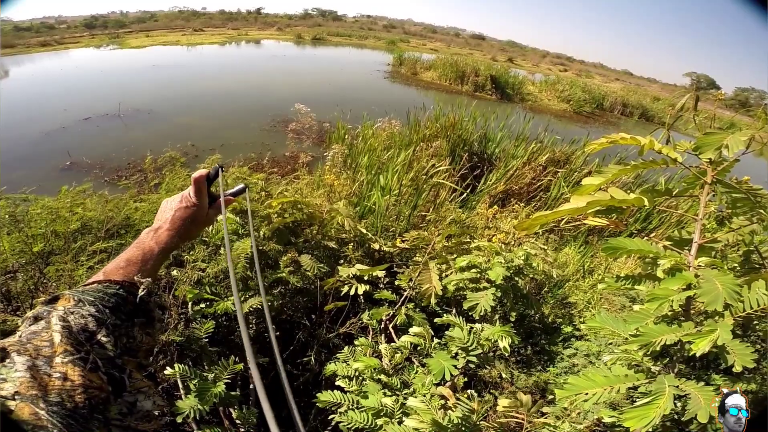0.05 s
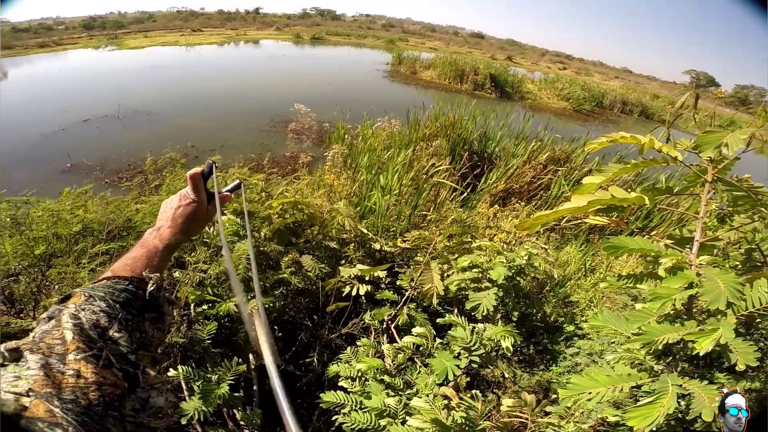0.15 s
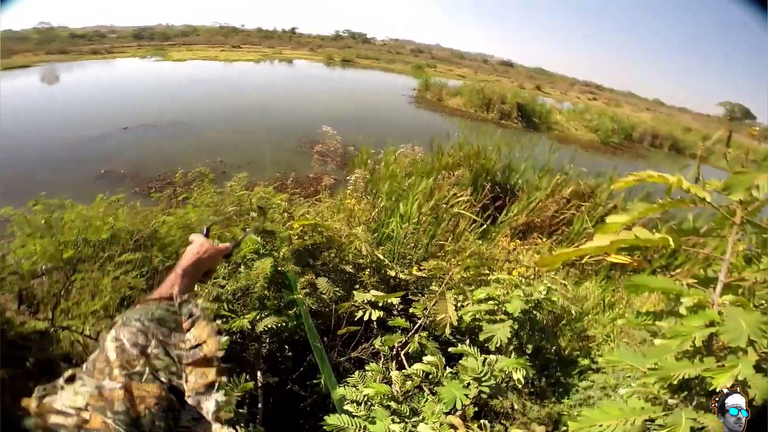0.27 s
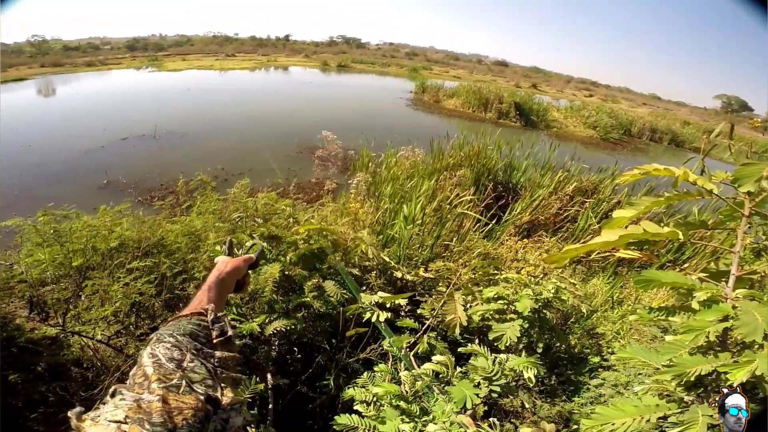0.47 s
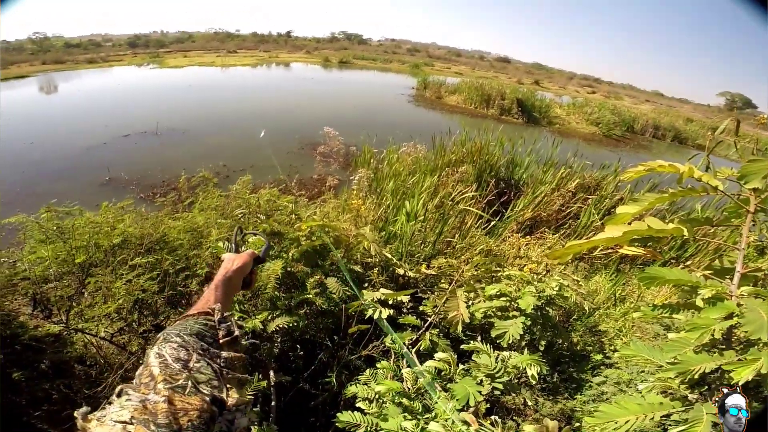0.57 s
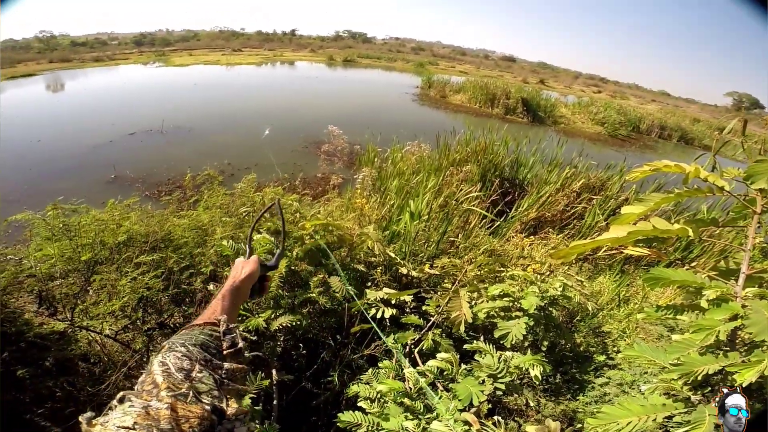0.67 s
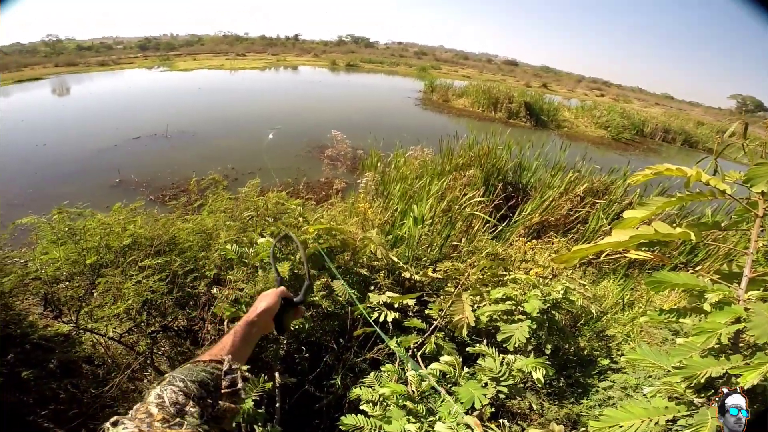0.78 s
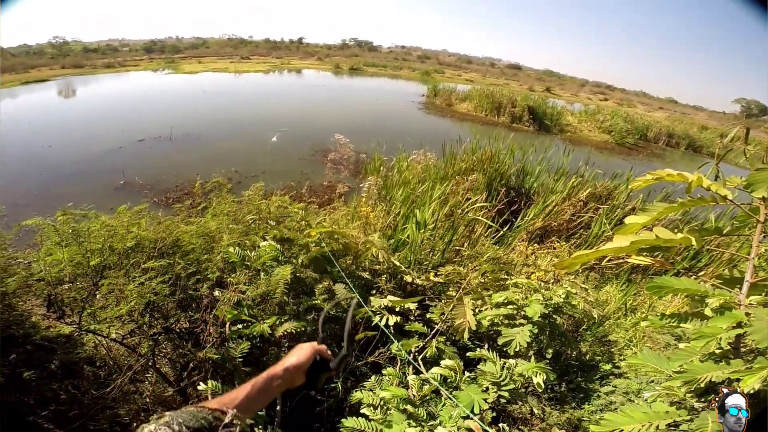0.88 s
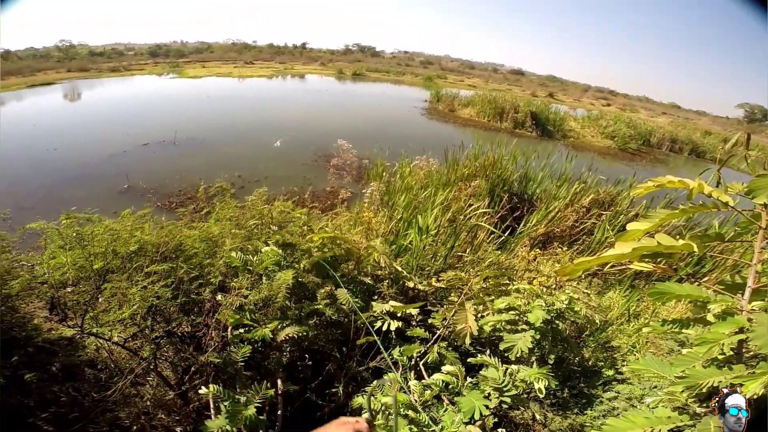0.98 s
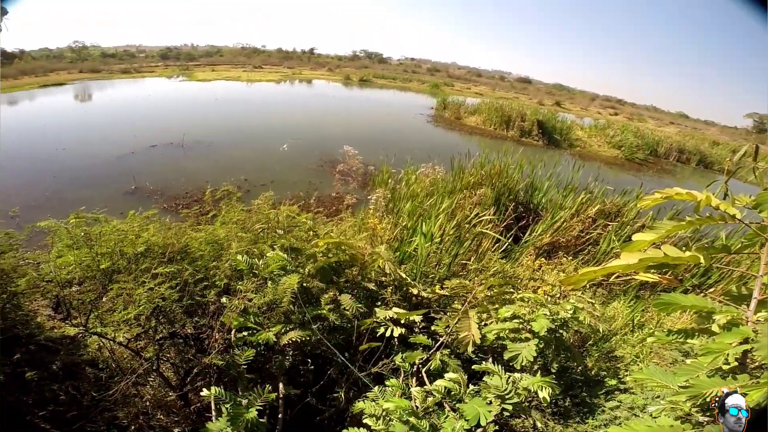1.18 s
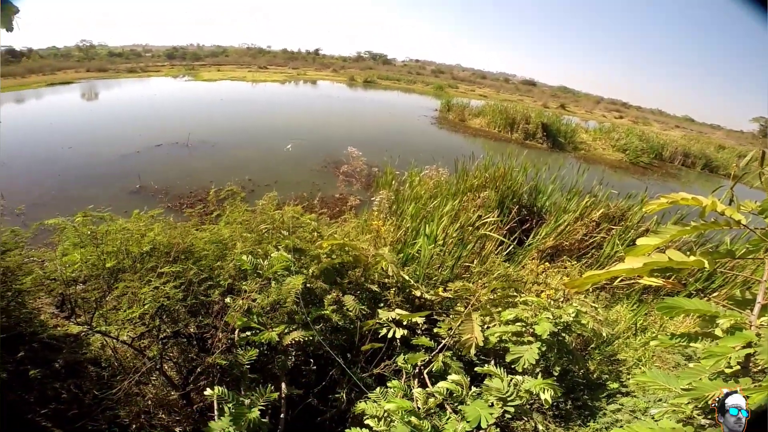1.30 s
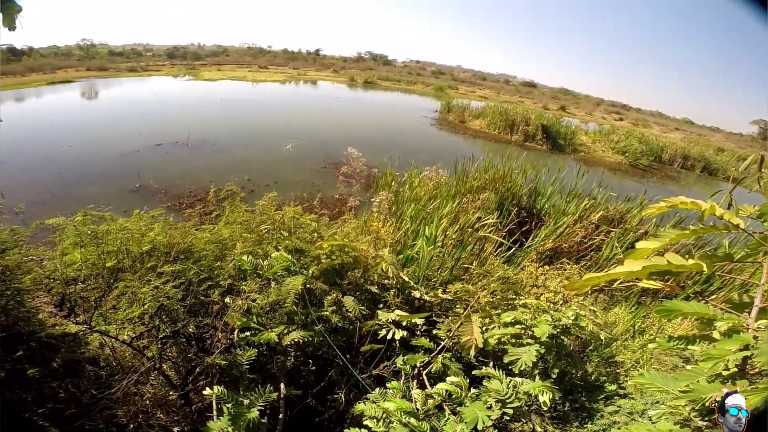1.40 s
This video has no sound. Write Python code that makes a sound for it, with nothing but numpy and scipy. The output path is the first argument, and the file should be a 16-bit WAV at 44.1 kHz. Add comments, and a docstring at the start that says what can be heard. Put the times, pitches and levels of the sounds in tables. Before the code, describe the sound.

A slingshot snaps sharply, a small line reel whines briefly and clatters to a stop, insects buzzing

```python
"""Beside a pond, a slingshot lets an arrow go: bands slap the fork in two quick flurries of swelling sines
and noise, and a small line reel whines at once, with a sagging stack of tooth partials, a rattle and
hissing line. It stops with noisy chatter, ringing knocks and a fading rustle. Crickets and cicadas buzz as
narrow bands of noise and one chirping tone, a distant engine drones in harmonics of its firing rate, and
filtered noise makes the open air and the light wind that rumbles on the microphone."""
import sys
import numpy as np
from scipy import signal
from scipy.fft import rfft, irfft
from scipy.io import wavfile

SR = 44100
rng = np.random.default_rng(int(sys.argv[2]) if len(sys.argv) > 2 else 0)


def amplitude_ratio(level_db):
    """Convert a level in decibels to the matching linear amplitude (field) ratio."""
    exponent = np.asarray(level_db, float) / 20
    return 10 ** exponent


def bounce(signal):
    """Save signal as a 16-bit WAV file at the path given by the first command-line argument."""
    frames = np.transpose(np.atleast_2d(signal))
    limited = np.clip(frames, -1, 1)
    pcm = np.round(limited * 32767).astype(np.int16)
    wavfile.write(sys.argv[1], SR, pcm)


N = 63945  # samples, 1.45 s

REEL_STOP_S = 0.577  # the whine ends here and the rustle begins just before


def rms_one(x):
    """Scale to rms 1."""
    return x / np.sqrt(np.mean(x ** 2) + 1e-20)


def in_time(rows):
    """Columns of a table, after its times, joined by straight lines."""
    s, *columns = np.transpose(rows)
    return [np.interp(np.arange(N) / SR, s, c) for c in columns]


def gate(start, stop, fade):
    """One between start and stop, with short ramps inside them."""
    t = np.arange(N) / SR
    return np.clip(np.minimum(t - start, stop - t) / fade, 0, 1)


def drift(rate):
    """Slow random wander of rms 1: noise through two equal low-pass poles at rate Hz."""
    # Made at a fortieth of the sample rate, after a run-in, then joined by straight lines.
    r = np.exp(-80 * np.pi * rate / SR)
    slow = signal.lfilter([1], [1, -2 * r, r * r], rng.standard_normal(N // 40 + 2002))[2000:]
    return np.interp(np.arange(N) / 40, np.arange(len(slow)), rms_one(slow))


def click(s, db):
    """One impulse, over a floor too small to hear that keeps the filters fast."""
    x = np.full(N, 1e-18)
    x[int(s * SR)] = amplitude_ratio(db)
    return x


def ring(x, hz, t60):
    """A two-pole resonance: a unit click sets a sine of height 1 ringing."""
    r = amplitude_ratio(-60 / (t60 * SR))
    w = 2 * np.pi * hz / SR
    return signal.lfilter([0, np.sin(w)], [1, -2 * r * np.cos(w), r * r], x)


def dying(x, t60):
    """Each click starts an envelope that falls 60 dB in t60 seconds."""
    return signal.lfilter([1], [1, -amplitude_ratio(-60 / (t60 * SR))], x)


def swell(s, rise):
    """A smooth hump of height 1 that starts at s and peaks rise seconds later."""
    u = np.clip((np.arange(N) / SR - s) / rise, 0, 60)
    return (u * np.exp(1 - u)) ** 2


def noise(spectrum):
    """Noise of the given colour, rms 1, its level joined by lines over log frequency."""
    hz, db = np.transpose(spectrum)
    f = np.arange(N // 2 + 1) * SR / N + 1
    colour = amplitude_ratio(np.interp(np.log(f), np.log(hz), db))
    return rms_one(irfft(rfft(rng.standard_normal(N)) * colour, N))


def band(x, low_hz, high_hz):
    """Band-pass, rms 1."""
    sos = signal.butter(2, [low_hz, high_hz], "band", fs=SR, output="sos")
    return rms_one(signal.sosfilt(sos, x))


def air():
    """Far traffic, wind and leaves merge into one gently wavering coloured noise."""
    # Colour of the open air: (f/Hz, relative level per Hz/dB)
    air_colour = [(12, -37), (30, -16), (70, -2.5), (148, 1.5), (306, -9), (465, -7), (1040, -7),
                  (1400, -12.5), (2000, -20), (3540, -26), (5000, -25), (6200, -35.5), (9000, -33.5),
                  (15500, -46.5)]
    return amplitude_ratio(-45.5 + 1.24 * drift(12)) * noise(air_colour)


def engine():
    """Low orders of the firing rate, in step so that each firing is a rounded puff."""
    # Distant engine: (t/s, firing rate/Hz, level/dB)
    engine_course = [(0, 69.4, -39), (.06, 68.95, -49.5), (.2, 68.96, -39.5), (.3, 69.3, -43.5),
                     (.46, 69.22, -37), (.65, 69.35, -37.5), (1.0, 69.1, -38), (1.06, 69.28, -41.5),
                     (1.17, 69.52, -39.5), (1.45, 69.27, -39.5)]
    # Engine orders: (multiple of the firing rate, relative level/dB)
    engine_orders = [(1, -1), (1.5, -18.5), (2, -6), (2.5, -15), (3, -14.5), (3.5, -21), (7, -18.5),
                     (15, -18), (17.5, -21.5)]
    waver_db = 1.2
    hz, db = in_time(engine_course)
    turn = 2 * np.pi * (np.cumsum(hz) / SR + rng.random())
    puffs = sum(amplitude_ratio(level + waver_db * drift(10)) * np.cos(k * turn) for k, level in engine_orders)
    return amplitude_ratio(db) * np.sqrt(2) * puffs


def insects():
    """Many uneven wing strokes into a narrow resonance for each kind, most of them throbbing."""
    # Kinds of insect: (centre f/Hz, bandwidth/Hz, level at the start/dB, wing strokes per s/Hz,
    # throb rate/Hz, throb depth/0-1, level slope/dB per s)
    insect_kinds = [(4693, 480, -51, 4400, 61, 0, -1.2), (5268, 126, -58, 2600, 3.9, 0.42, 3),
                    (5613, 240, -53, 2800, 17, 0.23, -2), (7090, 500, -66.5, 2900, 20, 0.24, -1),
                    (7574, 240, -65, 1700, 79, 0.33, 1), (9230, 820, -81.5, 2000, 20, .2, 5.5)]
    out, t = 0, np.arange(N) / SR
    for hz, width, db, strokes, throb, depth, swell_db in insect_kinds:
        # Random strokes stand out of a weaker steady hiss.
        taps = rng.standard_normal(N) * ((rng.random(N) < strokes / SR) + 0.26)
        buzz = band(taps, hz - width / 2, hz + width / 2)
        # A sine pressed towards a square, its timing slightly loose.
        beat = np.tanh(2 * np.sin(2 * np.pi * (throb * t + rng.random()) + 0.36 * drift(3)))
        level = amplitude_ratio(db + swell_db * t + 1.2 * drift(4))
        out = out + level * (1 + depth * beat) * buzz
    return out


def cricket():
    """One nearer cricket: evenly spaced chirps, each falling in pitch, with a faint octave."""
    # Nearness of this cricket: (t/s, relative level/dB)
    cricket_nearness = [(0, -5), (.4, -1), (.8, 0.5), (1.45, -3)]
    centre_hz, fall_hz, wander_hz = 5720, 60, 25  # fall_hz to either side of the centre
    chirps_per_s, chirp_offset_s = 25.8, 0.034
    level_db, octave_db = -52.5, -24
    beat = 2 * np.pi * chirps_per_s * (np.arange(N) / SR - chirp_offset_s)
    hz = centre_hz + fall_hz * np.cos(beat) + wander_hz * drift(60)
    turn = 2 * np.pi * np.cumsum(hz) / SR
    chirps = np.clip(0.5 + 1.5 * np.sin(beat), 0, 1) * amplitude_ratio(3.0 * drift(80))
    tone = np.sin(turn) + amplitude_ratio(octave_db) * np.sin(2 * turn)
    return amplitude_ratio(level_db + in_time(cricket_nearness)[0]) * chirps * tone


def wind():
    """Light gusts on the microphone make a lumpy rumble of very low noise."""
    # Wind on the microphone: (t/s, level/dB)
    gust_course = [(0, -57), (.17, -50), (.25, -37), (.4, -42), (.55, -48), (.7, -52), (1.45, -59)]
    return amplitude_ratio(in_time(gust_course)[0]) * band(rng.standard_normal(N), 5.5, 45)


def bumps():
    """Soft inward pushes on the microphone, each a smooth one-sided hump."""
    # Low bumps: (start t/s, peak level/dB, rise to the peak/s)
    bump_times = [(0.2328, -20, 0.00093), (.243, -24, 0.0013), (.367, -22.5, 0.004), (.405, -30, 0.0084)]
    return -sum(amplitude_ratio(db) * swell(s, rise) for s, db, rise in bump_times)


def ticks():
    """Small ticks of line and leaves, each a short puff of band noise."""
    # Ticks: (peak t/s, level at the peak/dB, lowest f/Hz, highest f/Hz)
    tick_times = [(0.3126, -36, 5460, 7840), (.3350, -37.5, 2500, 14500), (.4320, -52, 5500, 7500),
                  (.5560, -42, 8500, 11000), (0.6682, -42, 2000, 7000), (1.326, -44, 2200, 5000)]
    rise_s = 0.001
    out = 0
    for s, db, low_hz, high_hz in tick_times:
        puff = band(rng.standard_normal(N), low_hz, high_hz)
        out = out + amplitude_ratio(db) * swell(s - rise_s, rise_s) * puff
    return out


def reel_stop():
    """The reel chatters to a halt, its body knocks, and slack line settles through the leaves."""
    # Colour of chatter and rustle: (f/Hz, relative level per Hz/dB)
    stop_colour = [(350, -28), (600, -4.5), (2410, -9), (4350, -15), (4750, -10), (6100, -18), (12000, -32),
                   (15600, -52), (22000, -120)]
    # Knocks of the reel body: (t/s, ring height/dB)
    knock_times = [(0.6046, -29.5), (0.609, -20), (.6120, -45)]
    chatter_s, chatter_length_s, chatter_db = 0.592, 0.017, -39
    rustle_s, rustle_db, rustle_t60_s = REEL_STOP_S - 0.01, -45.5, 0.92
    knock_hz, knock_t60_s = 495.4, 0.014
    chatter_gate = gate(chatter_s, chatter_s + chatter_length_s, 0.003)
    chatter = amplitude_ratio(chatter_db + 2.0 * drift(300)) * chatter_gate
    # The gate only softens the onset; its end lies beyond the scene.
    rustle = gate(rustle_s, 2, 0.011) * dying(click(rustle_s, rustle_db), rustle_t60_s)
    knocks = ring(sum(click(s, db) for s, db in knock_times), knock_hz, knock_t60_s)
    return (chatter + rustle) * noise(stop_colour) + knocks


def fishing_line():
    """Line paying out through the air: a smooth bright hiss."""
    # Line hiss in time: (t/s, level/dB)
    line_course = [(0.27, -51), (0.326, -54), (0.334, -52), (0.346, -53), (0.434, -50), (0.664, -52.5),
                   (0.696, -61), (0.798, -67), (0.9, -82)]
    # Colour of the hiss: (f/Hz, relative level per Hz/dB)
    line_colour = [(3650, -33), (6200, -6), (6980, -29), (7540, -18), (8140, -7), (9240, 0), (10600, 1),
                   (15500, -19)]
    level = amplitude_ratio(in_time(line_course)[0] + 1.8 * drift(23))
    return level * gate(line_course[0][0], line_course[-1][0], 0.0063) * noise(line_colour)


def reel():
    """Gear teeth give a stack of wavering partials over a rattle pulsing at the tooth rate."""
    # Reel effort: (t/s, level/dB)
    reel_effort = [(.28, -35), (.296, -34), (0.329, -35), (.4, -37), (.458, -37), (.5, -34.5), (0.519, -39),
                   (.568, -38.5), (0.578, -44)]
    # Tooth partials: (multiple of the tooth rate, relative level at the start, middle, end/dB)
    tooth_partials = [(1, -21, -17.5, -19.5), (2, -1, -4, -7.5), (3, -11, -18, -8), (4, -4.5, -5, -8.5),
                      (5, -8, -20, -11), (6, -16, -19, -8), (7, -15.5, -4, -3.5), (8, -15, -17, -23),
                      (9, -20, -14, -16), (10, -12, -36, -40), (11, -40, -27, -28), (12, -34, -21, -26),
                      (13, -26, -22, -27), (14, -25, -32, -28), (15, -22, -24, -23)]
    # Colour of the rattle: (f/Hz, relative level per Hz/dB)
    rattle_colour = [(180, -53), (300, -21.5), (549, -7), (764, -12), (1080, -10.5), (1460, -16),
                     (1940, -14), (4680, -19.5), (8000, -33.5), (10400, -63), (17600, -120)]
    start_s, sag_s = 0.28, 0.15  # sag_s is a time constant
    fast_hz, slow_hz = 304, 259  # tooth rate at the start, and the rate it sags towards
    jitter, waver_db, rattle_db = 0.005, 2.2, -4.5  # jitter is a share of the tooth rate
    t = np.arange(N) / SR
    # The tooth rate sags as the arrow slows.
    hz = slow_hz + (fast_hz - slow_hz) * np.exp(-np.maximum(t - start_s, 0) / sag_s)
    turn = 2 * np.pi * np.cumsum(hz * (1 + jitter * drift(40.2))) / SR
    marks = np.linspace(start_s, REEL_STOP_S, 3)
    whine = 0
    for k, *dbs in tooth_partials:
        level = amplitude_ratio(np.interp(t, marks, dbs) + waver_db * drift(25))
        whine = whine + level * np.sin(k * turn + rng.uniform(0, 2 * np.pi))
    rattle = amplitude_ratio(rattle_db) * (1 + 0.23 * np.cos(turn)) * noise(rattle_colour)
    effort = amplitude_ratio(in_time(reel_effort)[0]) * gate(start_s, REEL_STOP_S, 0.0032)
    return effort * (np.sqrt(2) * whine + rattle)


def bands():
    """Each slap on the fork swells and dies at its own pitch, cracks, and leaves a spray of noise."""
    # Band slaps: (start t/s, hump height/dB, ring f/Hz, cycles to the peak of the hump)
    slap_times = [(.2284, -18.5, 900, 0.41), (0.2308, -13, 2020, 0.54), (0.2312, -23.5, 2710, 1.5),
                  (0.2318, -5.5, 3820, 0.64), (0.2358, -10.5, 3940, 0.86), (0.2363, -11, 1650, 0.21),
                  (0.2492, -11, 5570, 2.6), (0.2501, -3.5, 4560, 0.65), (.2516, -4.5, 2530, 0.88),
                  (.2520, -2.5, 3224, 3.26), (0.2503, -20, 1133, 1.2), (.2540, -17.5, 1310, 0.95),
                  (0.2553, -8.5, 1840, 0.79), (.2604, -19, 1500, 0.64), (0.2611, -6.5, 2270, 0.55),
                  (0.2637, -18, 5300, 1.6), (.2680, -20, 4540, 3.6), (0.2697, -18.5, 1820, 1),
                  (.2735, -19.5, 850, 0.47), (0.2845, -18.5, 3430, 2.9), (0.2871, -20, 830, 0.53),
                  (0.3332, -29.5, 1470, 4.5)]
    # Colour of crack and spray: (f/Hz, relative level per Hz/dB)
    spray_colour = [(180, -39), (300, -8.5), (922, -10.5), (1070, -10.5), (1620, -4.5), (1940, -16.5),
                    (3230, -11), (5570, -16.5), (15500, -45.5)]
    crack_db, crack_rise_s = -14, 0.0006  # level relative to the slap
    spray_db, spray_t60_s = -27, 0.059    # likewise
    t = np.arange(N) / SR
    rings, cracks, hits = 0, 0, 0
    for s, db, hz, cycles in slap_times:
        rings = rings + amplitude_ratio(db) * swell(s, cycles / hz) * np.sin(2 * np.pi * hz * (t - s))
        cracks = cracks + amplitude_ratio(db + crack_db) * swell(s, crack_rise_s)
        hits = hits + click(s, db)
    tails = amplitude_ratio(spray_db) * dying(hits, spray_t60_s)
    return rings + (cracks + tails) * noise(spray_colour)


def scene():
    """Everything in one microphone."""
    background = air() + engine() + insects() + cricket() + wind()
    shot = bumps() + ticks() + reel_stop() + fishing_line() + reel() + bands()
    return (background + shot)[None]


def band_limit(x):
    """A steep low-pass at the top of the band."""
    return signal.sosfilt(signal.butter(12, 15750, fs=SR, output="sos"), x)


def record(dry):
    """The highest peaks are rounded under a ceiling, and a steep low-pass cuts the top."""
    ceiling, cutoff_hz = 0.93, 16300  # ceiling in full scale
    rounded = dry / (1 + (dry / ceiling) ** 6) ** (1 / 6)
    low_pass = signal.cheby2(12, 70, cutoff_hz, fs=SR, output="sos")
    finished = signal.sosfilt(low_pass, rounded)
    return band_limit(finished)


dry = scene()
out = record(dry)
bounce(out)
```